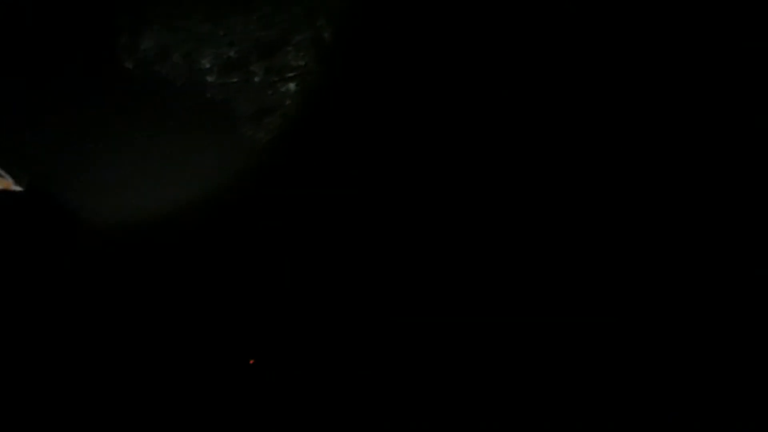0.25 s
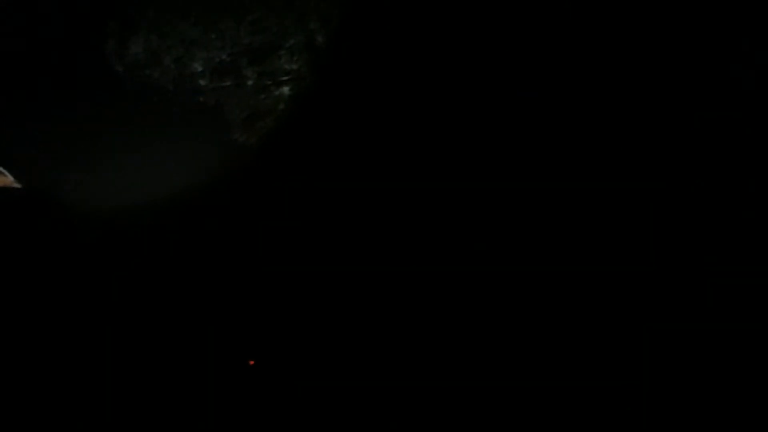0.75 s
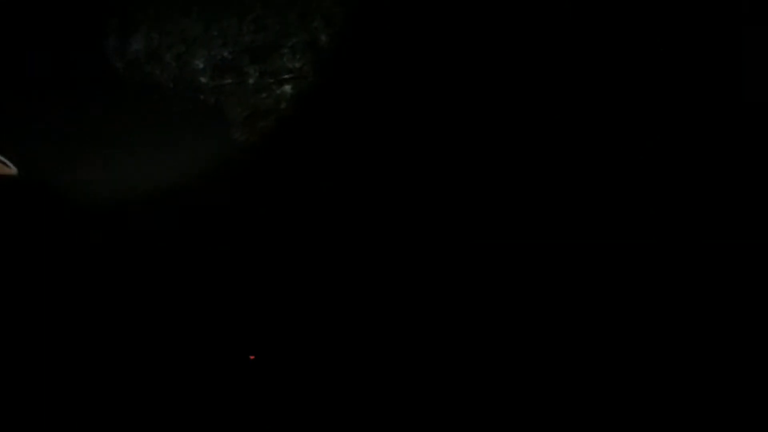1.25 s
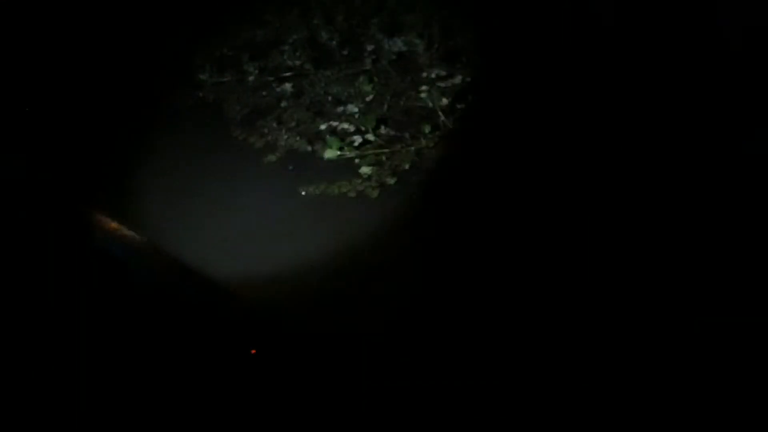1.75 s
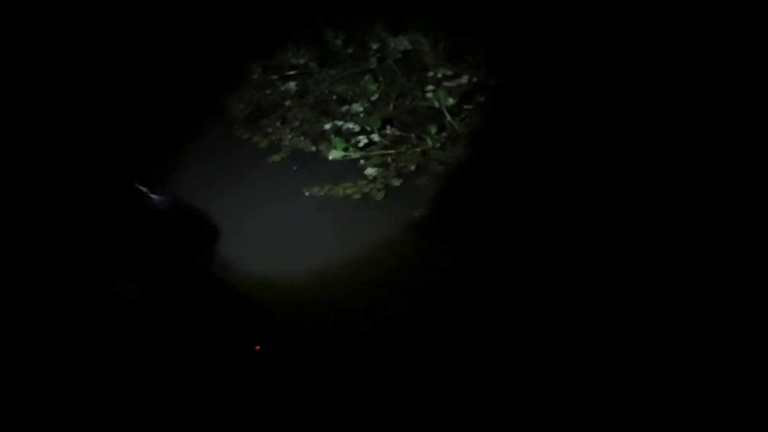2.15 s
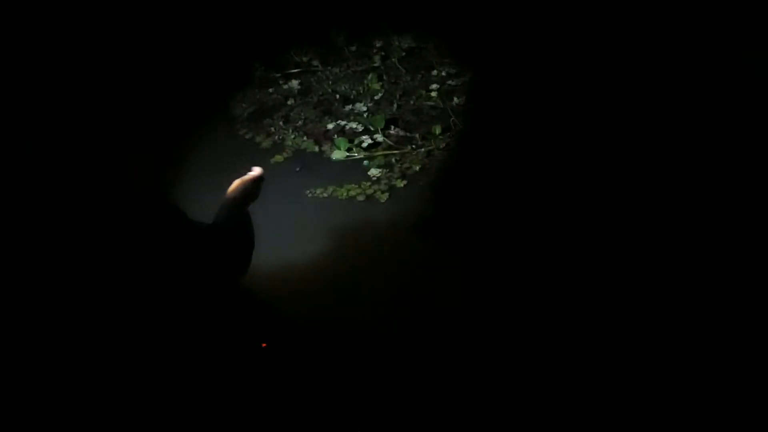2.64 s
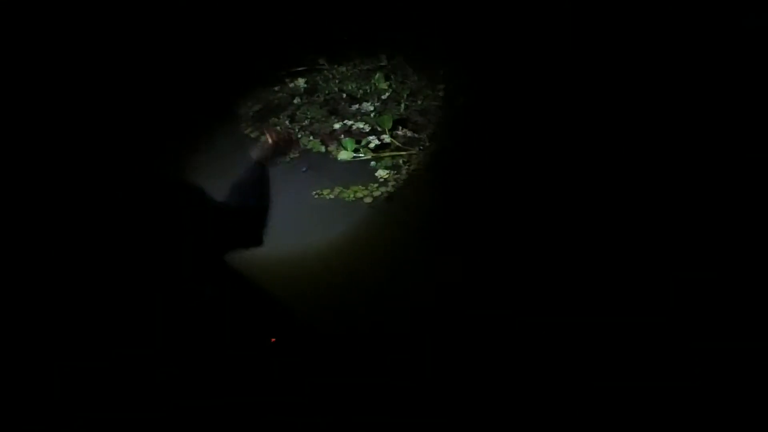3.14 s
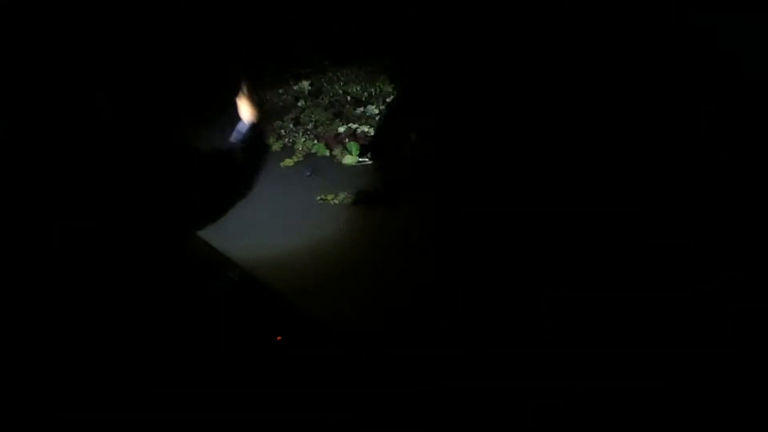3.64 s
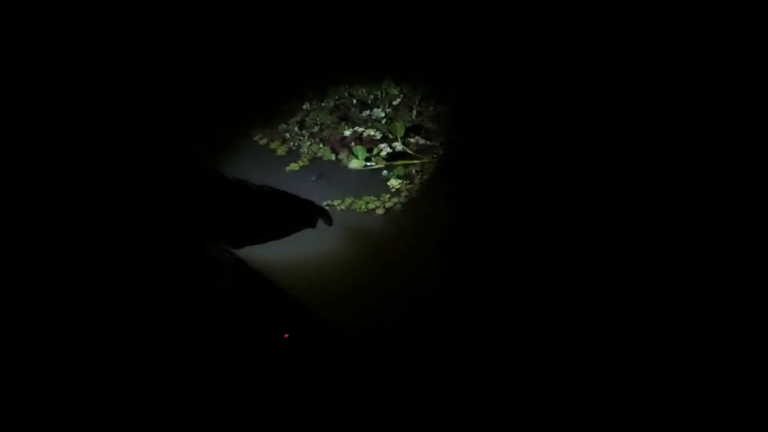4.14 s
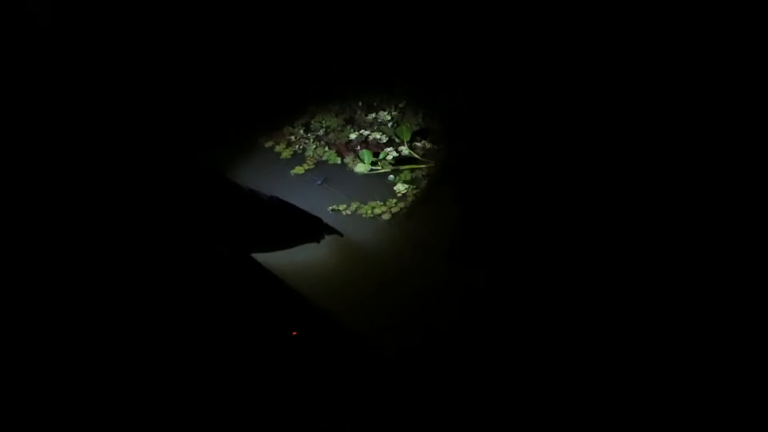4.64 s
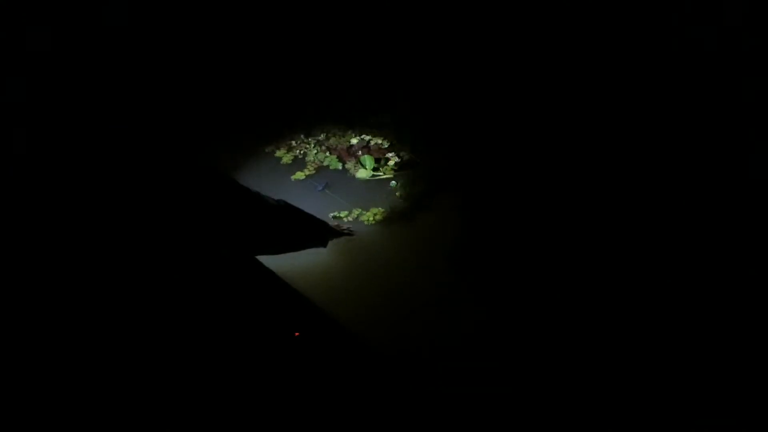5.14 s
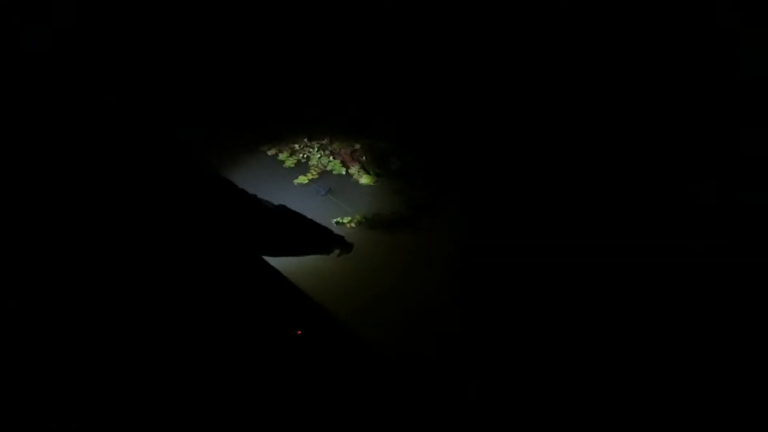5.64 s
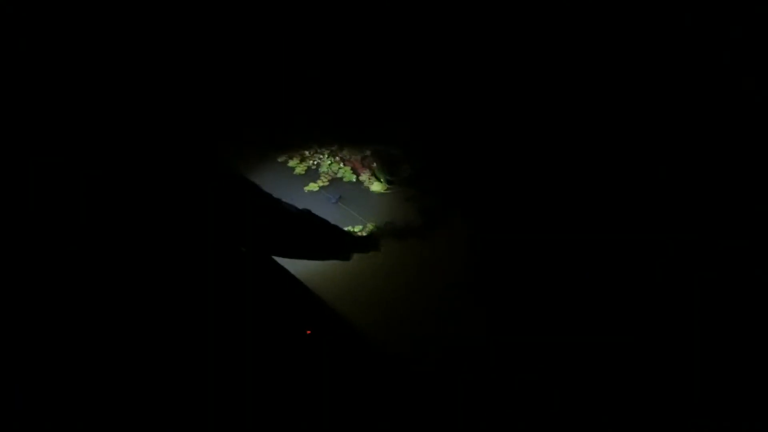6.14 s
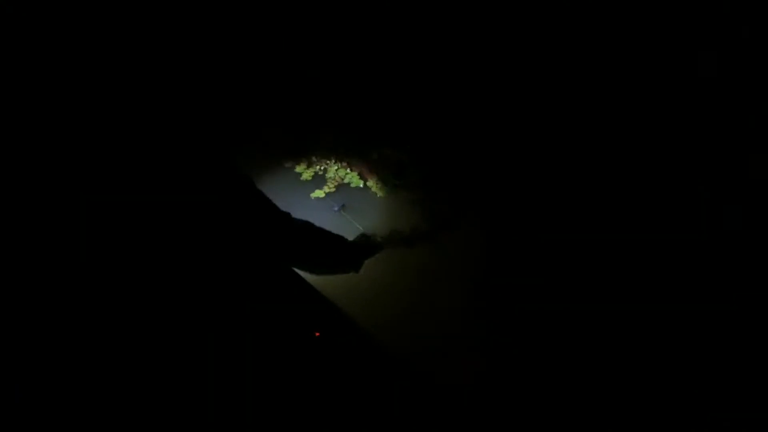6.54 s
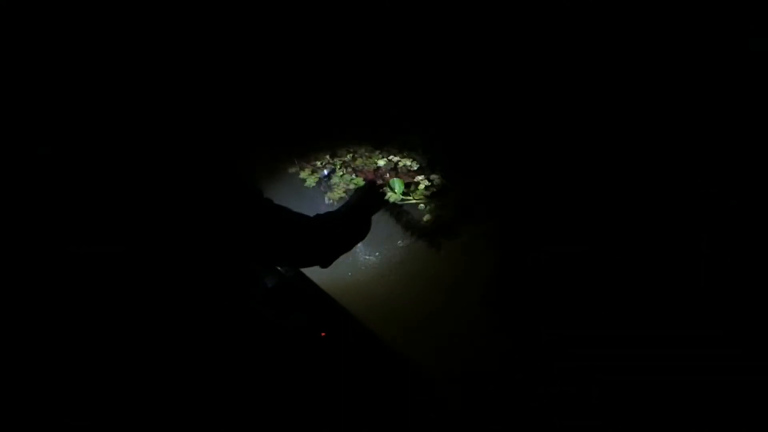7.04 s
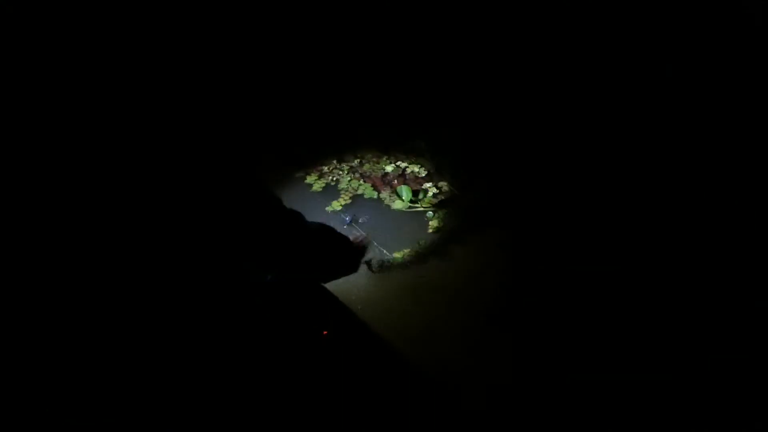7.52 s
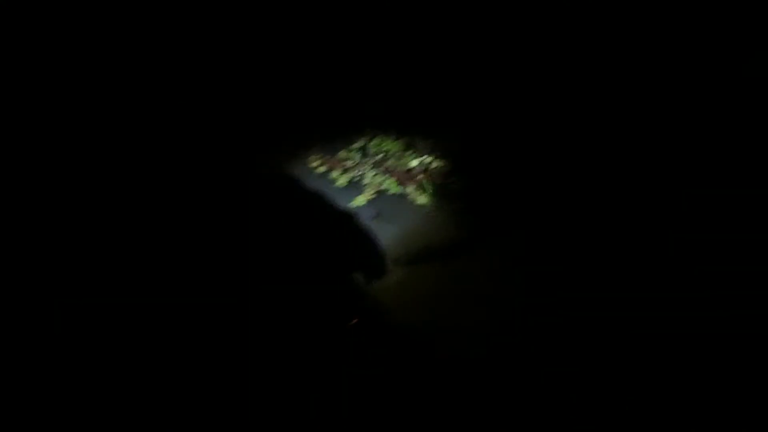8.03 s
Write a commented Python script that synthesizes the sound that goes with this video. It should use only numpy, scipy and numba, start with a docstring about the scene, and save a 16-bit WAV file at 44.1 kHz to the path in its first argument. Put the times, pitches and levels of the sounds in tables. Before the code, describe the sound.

Dark rainforest creek: shimmering crickets, crisp dry katydid rasps on the left, faint glugs under a boat, a water drop and a rising frog trill.

```python
"""Night on a rainforest creek, from a drifting boat

A murmur of water and leaves and the shrill of distant crickets are shaped noise. Planks knocked and a
bubble under a falling drop are decaying sines; water glugs at wavering pitches and gear scrapes as noise.
Frogs on the bank pip, chatter and trill as swept or pulsed tones. Close by on the left, katydids rasp
and shuffle: each tooth of the file rings the wings. A limiter ducks under the loudest rasps."""
import sys
import numpy as np
from scipy import signal
from scipy.fft import rfft, irfft
from scipy.io import wavfile
from scipy.ndimage import uniform_filter1d
from numba import njit

SR = 44100
rng = np.random.default_rng(int(sys.argv[2]) if len(sys.argv) > 2 else 0)


def dump(signal):
    """Clip the signal to [-1, 1] and save it as 16-bit WAV at the path in sys.argv[1]."""
    limited = np.clip(np.atleast_2d(signal).T, -1, 1)
    pcm = np.round(limited * 32767).astype(np.int16)
    wavfile.write(sys.argv[1], SR, pcm)


N = 365148
TIME = np.arange(N) / SR
FREQS = np.arange(N // 2 + 1) * SR / N

# Levels in all tables are relative: filters, panning and the limiter follow.
# resonance of the katydid's wings: [f/Hz, level/dB]
WING_RESONANCE = [(5500, -43), (7000, -39), (7400, -11.5), (8100, -20.5), (8700, -2), (9500, 2.5),
                  (10150, 5), (10750, -1.5), (11400, -1.5), (12100, -5.5), (12750, -4), (14000, -15.5),
                  (14800, -31.5), (15700, -39.5)]


def undb(db):
    """Convert decibels to amplitude gain."""
    return 10 ** (np.asarray(db) / 20)


def unit(x):
    """Normalise to an rms value of 1."""
    return x / np.sqrt(np.mean(x ** 2))


def pan(db):
    """Interaural level difference: gains for left minus right, in dB."""
    return undb(np.array([[db], [-db]]) / 2)


def over_hz(points, hz=FREQS):
    """Interpolate (f/Hz, value) points on a logarithmic frequency axis."""
    f, value = np.transpose(points)
    return np.interp(np.log(hz + 1), np.log(f), value)


def shape(x, gain):
    """Linear filtering: multiply the spectrum by a gain for each frequency."""
    return irfft(rfft(x) * gain, N)


def band(hz, width):
    """Squared magnitude response of a resonance, as if it were applied twice."""
    detuning = (FREQS ** 2 - hz ** 2) / ((FREQS + 1) * width * np.pi / 2)
    return 1 / (1 + detuning ** 2)


def spread(sound, apart):
    """Partial coherence: of three unrelated signals one is shared and one belongs to each side."""
    return unit(sound[0] + apart * sound[1:])


def walk(rate):
    """Band-limited random modulation: unit-rms wandering through `rate` random knots per second."""
    knots = rng.standard_normal(int(N / SR * rate) + 2)
    return unit(np.interp(TIME * rate, np.arange(len(knots)), knots))


def swell(t, length):
    """Gaussian envelope, about 4 dB down at half its length from the middle."""
    return np.exp(-2 * (t / length) ** 2)


def add(track, start, sound):
    """Superposition: mix a sound in from a start time in s."""
    i = int(start * SR)
    lo, hi = max(i, 0), min(i + len(sound), N)
    if hi > lo:
        track[lo:hi] += sound[lo - i:hi - i]


def forest(x, wet_db, t60):
    """Diffuse scattering from leaves and trunks: direct sound plus a decaying noise tail for each side."""
    t = TIME[:SR // 2]
    envelope = undb(-60 * t / t60) * (1 - np.exp(-t / .003))
    tail = rng.standard_normal((2, len(t))) * envelope
    tail /= np.sqrt(np.sum(tail ** 2, axis=1, keepdims=True))
    return x + undb(wet_db) * signal.fftconvolve(x[None], tail, axes=1)[:, :N]


def air(flicker_db=1.7):
    """Broadband turbulence: a low, softly fluttering murmur of water and leaves."""
    # murmur of the creek and forest: [f/Hz, level/dB]
    murmur_spectrum = [(20, -29), (45, -7), (65, -10), (110, -0.5), (180, 1), (300, 2), (450, -0.5),
                       (650, -4.5), (900, -5.5), (1300, -6.5), (1700, -12.5), (2300, -12), (3000, -16),
                       (8000, -12)]
    # strength of the murmur: [t/s, level/dB]
    murmur_course = [(0, -58.5), (2.2, -56), (4.6, -58), (6.2, -57.5), (6.7, -55.5), (8.28, -55.5)]
    gain = undb(over_hz(murmur_spectrum)) * (FREQS < 9000)
    murmur = spread(shape(rng.standard_normal((3, N)), gain), apart=0.48)
    level_db = np.interp(TIME, *np.transpose(murmur_course)) + flicker_db * walk(18)
    return undb(level_db) * murmur * pan(-1.72)


def crickets(shrill_hz=5200, drift_db=1.3, surge_peak_s=0.36, surge_period_s=1.27, surge_db=0.7):
    """Incoherent sum of many voices: each group is a noise band with random chirping."""
    # distant groups: [f/Hz, nominal width/Hz, level/dB, nominal chirp rate/Hz, chirp depth/dB,
    # left minus right/dB]
    cricket_groups = [(2520, 370, -73.5, 23, 5, 2), (3372, 32, -71, 12, 2, -6), (3410, 130, -77, 17, 4, -5),
                      (3538, 23, -72, 8.5, -0.5, 6), (3808, 225, -64.5, 41, 0, -6),
                      (4333, 464, -57.5, 37, 0.5, -0.5), (4905, 230, -67, 19, 2, -5),
                      (5470, 330, -57.5, 31, 1, 0), (5800, 356, -54.5, 53, 1.3, 3.5),
                      (6234, 490, -58.5, 19, 1.5, -2), (6770, 3500, -62.5, 19, 2, 9)]
    # the shrillest groups swell together in slow waves
    surge = undb(surge_db * np.cos(np.pi * (TIME - surge_peak_s) / surge_period_s) ** 2)
    out = 0
    for hz, width, db, rate, depth_db, pan_db in cricket_groups:
        noise = rng.standard_normal((3, N))
        voices = spread(shape(noise, band(hz, width) ** 1.44), apart=0.59)
        chirps = unit(undb(depth_db * walk(2 * rate) + drift_db * walk(1.816)))
        wave = surge if hz > shrill_hz else 1
        out = out + undb(db) * voices * chirps * pan(pan_db) * wave
    return out


def mode(hz, t60):
    """Damped normal mode: a sine decaying by 60 dB in t60 seconds."""
    t = TIME[:SR // 3]
    return np.sin(2 * np.pi * hz * t) * np.exp(-np.log(1000) * t / t60)


def glug(hz, length, attack_s=0.0012, sag=0.13, wobble=0.13, churn=0.55):
    """Cavity resonance: water shuts a pocket of air, a thud at a wavering pitch with some churning."""
    t = np.arange(0, 4 * length, 1 / SR)
    waver = np.interp(t / length, np.linspace(0, 4, 12), rng.standard_normal(12))
    pitch = hz * 2 ** (wobble * waver - sag * t / length)
    boom = np.sqrt(2) * np.sin(2 * np.pi * np.cumsum(pitch) / SR)
    hull = signal.butter(4, [hz * .65, hz * 1.7], "band", fs=SR, output="sos")
    # a long run lets the filter settle; only its end is used
    water = unit(signal.sosfilt(hull, rng.standard_normal(SR)))[-len(t):]
    envelope = (1 - np.exp(-t / attack_s)) * np.exp(-(t / length) ** 2 / 2)
    return envelope * (boom + churn * water)


def boat(knock_db=7.0, contact_s=.0008, bass_hz=(400, 900), scrape_db=-1.0):
    """Modal excitation: knocks ring the planks; water glugs under the hull and gear scrapes along it."""
    # knocks on the boat: [t/s, level/dB, bass level/dB]
    knock_events = [(.928, -62, 4.5), (.999, -62.5, 3), (1.118, -65, 2.5), (5.532, -58.5, -12),
                    (5.568, -63, -12), (5.596, -63.5, -8), (6.503, -60.5, -5), (8.004, -50.5, -2),
                    (8.067, -62, 0)]
    # modes of the boat's planks: [f/Hz, level/dB, t60/s]
    plank_modes = [(86, -5, 0.12), (137, -3.5, 0.076), (193, -1.5, 0.12), (345, 1, 0.045), (412, 5, 0.05),
                   (630, -1.5, 0.03), (753, -0.5, 0.038), (997, 1.5, 0.048), (1217, 2.5, 0.028),
                   (1334, -5, 0.044), (2230, -1, 0.016), (2670, -11, 0.031)]
    # glugs and dull bumps of water under the hull: [start t/s, f/Hz, level/dB, nominal length/s]
    water_bumps = [(0.664, 246, -59, 0.014), (0.94, 124, -53, .016), (1.142, 167, -56, 0.018),
                   (1.172, 190, -57, 0.023), (1.495, 178.4, -58, 0.043), (2.238, 210, -61.5, 0.03),
                   (2.972, 335, -50, 0.017), (3.015, 307, -60, 0.017), (3.24, 194, -54.5, 0.028),
                   (3.285, 169, -57, 0.029), (3.423, 290, -59.5, 0.02), (3.444, 177, -51, 0.019),
                   (5.266, 296, -52, 0.019), (5.308, 262, -53, 0.015), (5.343, 269, -50.5, 0.016),
                   (5.386, 290, -60, .012), (5.411, 263, -59.5, 0.028)]
    # gear scraping on the boat: [middle t/s, level/dB, nominal length/s]
    gear_scrapes = [(0.919, -63.5, 0.28), (8.09, -56, 0.12)]
    out = np.zeros(N)
    for s, db, bass_db in knock_events:
        # every blow lands on another spot, which detunes the modes
        spots = rng.standard_normal(len(plank_modes))
        for k, ((hz, gain_db, t60), spot) in enumerate(zip(plank_modes, spots)):
            tone = (-1) ** k * mode(hz * (1 + .02 * spot), t60)
            push = 1 - np.exp(-TIME[:len(tone)] / contact_s)
            low_db = bass_db * np.interp(hz, bass_hz, [1, 0])  # the low modes answer differently
            add(out, s, undb(db + knock_db + gain_db + low_db) * push * tone)
    for s, hz, db, length in water_bumps:
        add(out, s, undb(db) * glug(hz, length))
    rubbing = unit(shape(rng.standard_normal(N), band(hz=650, width=2300)))
    friction = rubbing * unit(undb(4.3 * walk(160)))
    out += friction * sum(undb(db + scrape_db) * swell(TIME - s, length) for s, db, length in gear_scrapes)
    return forest(out, wet_db=-13, t60=0.16) * pan(-9.5)


def drop():
    """Bubble oscillation: air trapped by a drop falling into the creek rings briefly."""
    # the drop: (t/s, bubble f/Hz, level/dB, t60/s)
    s, hz, db, t60 = (7.238, 930, -34.5, .07)
    out = np.zeros(N)
    bubble = mode(hz, t60)
    onset = 1 - np.exp(-TIME[:len(bubble)] / 0.0011)
    add(out, s, undb(db) * bubble * onset)
    return forest(out, wet_db=-13.0, t60=0.1) * pan(-9.5)


def pips(steepen_s=0.024, rough_db=3.0):
    """Frequency modulation: tiny hoarse whistles whose sweep steepens, rising at most an octave."""
    # pips of small frogs along the bank: [middle t/s, f/Hz there, level/dB, length/s,
    # sweep there/(octaves per s)]
    pip_notes = [(0.55, 1226, -55.5, 0.02, 25.5), (4.678, 1325, -54, 0.0053, 13),
                 (5.681, 1321, -56, 0.0069, 16), (5.82, 1243, -52, 0.0073, 16),
                 (5.974, 1855, -53, 0.0044, 18), (6.083, 1314, -58, 0.0073, 16),
                 (6.417, 1350, -56, 0.0083, 14), (6.574, 1857, -49.5, 0.0084, 20),
                 (6.754, 1314, -55, .007, 14), (7.21, 1820, -49, 0.0046, -22),
                 (7.222, 1340, -47, 0.0053, 17), (7.35, 1370, -57, 0.0054, 20),
                 (7.713, 1760, -54, 0.0064, -10), (7.75, 1336, -55, 0.0068, 10)]
    out = np.zeros(N)
    for s, hz, db, length, sweep in pip_notes:
        t = np.arange(-2 * length, 2 * length, 1 / SR)
        octaves = np.minimum(sweep * t * (1 + t / steepen_s), 1)
        whistle = np.sin(2 * np.pi * np.cumsum(hz * 2 ** octaves) / SR)
        add(out, s - 2 * length, np.sqrt(2) * undb(db) * swell(t, length) * whistle)
    hoarse = out * unit(undb(rough_db * walk(700)))
    return forest(hoarse, wet_db=-9, t60=0.05) * pan(-6.0)


def chatter(length=0.01, scoop=0.266, sag=0.081, third_db=-3, rough_db=4):
    """Harmonic synthesis: a frog's reedy notes leap up and sag, hoarse and rich in overtones."""
    # notes of the chatter: [middle t/s, nominal f/Hz, level/dB, overtone level/dB]
    chatter_notes = [(2.735, 1356, -45.5, -7), (2.78, 1267, -52, -3), (2.822, 1200, -58, 5),
                     (2.865, 1196, -53.5, 1), (2.913, 1080, -57.5, 4)]
    out = np.zeros(N)
    t = np.arange(-length, 2 * length, 1 / SR)
    bend = 2 ** (-sag * t / length - scoop * np.exp(-4 * (t / length + .5)))
    for s, hz, db, over_db in chatter_notes:
        angle = 2 * np.pi * np.cumsum(hz * bend) / SR
        first, second, third = (np.sin(k * angle) for k in range(1, 4))
        voice = first + undb(over_db) * (second + undb(third_db) * third)
        add(out, s - length, np.sqrt(2) * undb(db) * swell(t, length) * voice)
    hoarse = out * unit(undb(rough_db * walk(900)))
    return forest(hoarse, wet_db=-11.0, t60=0.083) * pan(-1.9)


def trill_course(rise_hz_per_s=1000, edge_s=0.0086):
    """Slow control of a pulsed voice: pitch, loudness, effort (1 at the end of each trill), remoteness and
    elapsed time."""
    # trills and their short closing notes: [start t/s, end t/s, nominal final f/Hz, final level/dB,
    # crescendo/dB, remoteness 0-1]
    trill_notes = [(0.2, 0.36, 2470, -72, 0, .95), (1.74, 1.88, 2510, -74, 1, 1),
                   (5.98, 6.06, 2523, -70.5, -1, 1), (6.065, 6.2, 2686, -68.5, -5, 0.98),
                   (6.22, 6.37, 2750, -74, -1, 1), (6.53, 6.72, 2594, -63.5, 7, 0.89),
                   (6.742, 6.775, 2544, -63.5, -4, 0.97), (6.8, 6.96, 2820, -73, -2, 0.9),
                   (7.09, 7.295, 2496, -53, 15.5, 0.28), (7.368, 7.634, 2560, -39.5, 24.5, 0.05),
                   (7.663, 7.692, 2590, -44.5, 0, 0.04), (7.72, 7.96, 2647, -64, 5, 1),
                   (8.13, 8.3, 2490, -58, 10, 0.95)]
    pitch = np.full(N, float(trill_notes[0][2]))
    loud, effort, remote, elapsed = np.zeros(N), np.ones(N), np.zeros(N), np.zeros(N)
    for start, end, hz, db, crescendo_db, remoteness in trill_notes:
        on = (TIME > start - edge_s / 2) & (TIME < end + edge_s / 2)
        t = TIME[on]
        edges = np.clip(np.minimum(t - start, end - t) / edge_s + .5, 0, 1)
        pitch[on] = hz - rise_hz_per_s * (end - t)
        effort[on] = undb(-crescendo_db * ((end - t) / (end - start)) ** 2)
        loud[on] = edges * undb(db) * effort[on]
        remote[on] = np.clip(remoteness, 0, 1)
        elapsed[on] = t - start
    return pitch, loud, effort, remote, elapsed


def trilling_frog(rise=0.12, weak_fall=0.12, fall=0.4, droop=0.065, detune=.008, far_detune=0.0195,
                  waver_db=1.5, stumble=0.068, pulses_per_s=98.7, trill_db=11.0, far_db=-3.0):
    """Pulsed excitation: each throat pulse swells fast, rings longer with effort and sags in pitch."""
    hz, loud, effort, remote, elapsed = trill_course()
    beats = elapsed * pulses_per_s
    phase = (beats + stumble * (1 - effort) * walk(50)) % 1
    # each pulse draws its own starting phase, size and detuning
    count = np.cumsum(np.diff(phase, prepend=0) < -.5)
    offset, size, sharp = rng.standard_normal((N // 100, 3))[count].T
    ringing = np.interp(effort * (1 - remote / 2), [0, 1], [weak_fall, fall])
    attack = 1 - np.exp(-(phase / rise) ** 2)
    pulse = attack * np.exp(-phase / ringing) * (1 - phase ** 8) * (fall / ringing)
    pitch = hz * (1 + droop * (.3 - phase) + (detune + far_detune * remote) * sharp)
    loud = loud * undb(waver_db * (1 - effort) * walk(40))  # unsteady until the frog is in full voice
    tone = np.sqrt(2) * np.sin(2 * np.pi * np.cumsum(pitch) / SR + 1.47 * offset)
    voice = loud * undb(trill_db + size / 2) * pulse * tone
    near, far = voice * (1 - remote), voice * remote * undb(far_db)
    blurred = forest(far, wet_db=1.5, t60=0.06)  # remote trills blur among the trees
    return (forest(near, wet_db=-9.5, t60=0.065) + blurred) * pan(-8.0)


def ring(spectrum, size=512):
    """Minimum-phase response by cepstral folding: causal, of a given spectrum, with unit energy."""
    hz = np.arange(size // 2 + 1) * SR / size
    cepstrum = irfft(np.log(undb(over_hz(spectrum, hz))))
    cepstrum[1:size // 2] *= 2
    cepstrum[size // 2 + 1:] = 0
    response = irfft(np.exp(rfft(cepstrum)))
    return response / np.sqrt(np.sum(response ** 2))


def wing(stroke_db, treble_db, vary_db=1.0, treble_hz=(8400, 12600),
         hard_from_db=-28.5, hard_low_db_per_db=0.67, hard_low_hz=(8260, 9000)):
    """Level-dependent resonance: hard strokes also stir the wings' lower ring, and no two are alike."""
    hz, db = np.transpose(WING_RESONANCE)
    lift = treble_db * np.interp(hz, treble_hz, [0, 1])
    hardness_db = max(stroke_db - hard_from_db, 0)
    body = hard_low_db_per_db * hardness_db * np.interp(hz, hard_low_hz, [1, 0])
    variation = vary_db * rng.standard_normal(len(hz))
    return ring(np.transpose([hz, db + lift + body + variation]))


def stroke(length, tooth_hz, jitter=0.16, uneven_db=2.0, scatter=0.75, scatter_s=0.00083):
    """Stridulation: a scraper clicks over each tooth of a file, building slowly and stopping quickly."""
    gap, size = rng.standard_normal((2, 160))
    times = np.cumsum(np.exp(jitter * gap)) / tooth_hz
    place = times / length - 2  # in stroke lengths from the strongest click
    force = np.where(place < 0, swell(place, 0.95), np.exp(-(np.abs(place) / 0.52) ** 4))
    clicks = np.zeros(int(4 * length * SR) + 1)
    inside = place < 2
    clicks[(times[inside] * SR).astype(int)] = (force * undb(uneven_db * size))[inside]
    # the wing flutters on briefly after each click, differently for every tooth
    keep = np.exp(-1 / (scatter_s * SR))
    envelope = np.sqrt(signal.lfilter([1 - keep], [1, -keep], clicks ** 2))
    flutter = envelope * rng.standard_normal(len(clicks))
    return (clicks + scatter * flutter) * np.sqrt(SR / tooth_hz / (1 + scatter ** 2))


def shuffle(loose_s=0.0033, loose_db=3.5, steady_db=1.3, stroke_share=.44, trail_stroke_s=0.021,
            trail_drop_db=4, trail_max_db=-50, trail_fade_db_per_s=9, trail_strokes_per_s=29):
    """Quasi-periodic strokes (t/s, level/dB, length/s): even runs, each trailing off loosely to the next."""
    # runs of even wing strokes: [first stroke t/s, last stroke t/s, rate/(strokes per s),
    # first level/dB, last level/dB]
    stroke_runs = [(0.087, 0.253, 30, -46.5, -47), (0.792, 0.99, 32, -42, -44),
                   (1.178, 1.27, 19, -45, -40.5), (1.544, 1.87, 28.7, -44, -52.5),
                   (2.558, 2.773, 34, -45.5, -48.5), (3.564, 3.935, 31.5, -45.5, -49.5),
                   (4.561, 4.83, 32, -44.5, -43), (4.87, 5.22, 26.5, -42, -42),
                   (5.449, 5.674, 30.3, -50, -50), (6.063, 6.205, 11.4, -40.5, -41.5),
                   (6.409, 6.534, 25.5, -43.5, -41), (6.768, 6.826, 33.5, -47.5, -44.5),
                   (7.741, 7.982, 35, -45, -48.5)]
    strokes = []
    next_starts = [run[0] for run in stroke_runs[1:]] + [N / SR]
    for (first, last, rate, first_db, last_db), resume in zip(stroke_runs, next_starts):
        run_chance, trail_chance = rng.standard_normal((2, 64, 2))
        times = np.linspace(first, last, round((last - first) * rate) + 1)
        for s, (effort, _) in zip(times, run_chance):
            db = np.interp(s, [first, last], [first_db, last_db]) + steady_db * effort
            strokes.append((s, db, stroke_share / rate))  # a stroke fills a share of its cycle
        trail_count = round((resume - last) * trail_strokes_per_s)
        times = np.linspace(last, resume, trail_count + 1)[1:-1]
        trail_db = min(last_db - trail_drop_db, trail_max_db)
        for s, (effort, late) in zip(times, trail_chance):
            db = trail_db - trail_fade_db_per_s * (s - last) + loose_db * effort
            strokes.append((s + loose_s * late, db, trail_stroke_s))
    return strokes


def katydid(tooth_hz=900, soft_tooth_hz=1100, far_db=-62, far_rough_db=1.5, far_shuffle_db=1.7):
    """Source and resonator: tooth clicks of rasps and softer strokes are convolved with the wings' ring."""
    # single rasps, the loudest about once a second: [middle t/s, level/dB, nominal length/s,
    # treble level/dB]
    rasp_events = [(0.058, -41, 0.019, 2), (0.518, -35.5, 0.017, 8), (0.734, -40, 0.023, 0),
                   (1.027, -44.5, 0.028, -8), (1.403, -23.5, 0.02, 7.5), (1.482, -35.5, 0.019, 3),
                   (1.735, -41, 0.023, 9), (1.979, -40.5, 0.011, -15), (2.231, -40.5, 0.035, -1),
                   (2.447, -23, 0.023, 10), (2.507, -36.5, 0.027, 9), (2.807, -43, 0.029, 2),
                   (2.938, -38.5, 0.022, -3), (3.008, -43, 0.022, 3), (3.325, -42.5, 0.025, 2),
                   (3.496, -25, 0.021, 7), (3.621, -37.5, 0.027, 9), (3.877, -45, 0.023, -1),
                   (4.412, -37.5, 0.023, -2), (4.513, -42, 0.051, 3), (4.615, -36.5, 0.031, 6),
                   (5.363, -25.5, 0.024, 6.5), (5.735, -35.5, 0.022, 10), (6.325, -33, 0.021, -8),
                   (6.681, -24.5, 0.022, 5), (6.885, -36.5, 0.025, 10), (7.507, -41.5, 0.036, 0),
                   (7.635, -26, 0.026, 5.5), (7.861, -43, 0.025, -2), (8.027, -33.5, 0.014, -7),
                   (8.08, -35.5, 0.024, 8)]
    song = np.zeros(N)
    for s, db, length, treble_db in rasp_events:
        clicks = stroke(length, tooth_hz, jitter=.09, uneven_db=.5, scatter=.6)
        add(song, s - 2 * length, undb(db) * signal.fftconvolve(clicks, wing(db, treble_db)))
    for s, db, length in shuffle():
        clicks = stroke(length, soft_tooth_hz)
        add(song, s - 2 * length, undb(db) * signal.fftconvolve(clicks, wing(db, 0)))
    near = forest(song, wet_db=-4.5, t60=0.04) * pan(7.6) * undb(-4.0)
    # more of its kind, far off, merge into a grainy, restless hiss that fills the gaps
    noise = rng.standard_normal((3, N))
    far = spread(shape(noise, undb(over_hz(WING_RESONANCE))), apart=0.15)
    grain = unit(undb(far_rough_db * walk(1500) + far_shuffle_db * walk(60)))
    return near + undb(far_db) * far * grain * pan(9.7)


def scene():
    """Superposition of all the night's sounds."""
    background = air() + crickets() + boat() + drop()
    frogs = pips() + chatter() + trilling_frog()
    return background + frogs + katydid()


@njit
def follow(x, release):
    """Peak detection: rises at once and falls back exponentially."""
    out, e = np.empty(len(x)), 0.
    for i in range(len(x)):
        e = max(x[i], e * release)
        out[i] = e
    return out


def record(dry, limit_db=-15.5, release_s=0.33, top_hz=15500):
    """Interchannel phase, then limiting: the bass turns out of phase, peaks are held, the top is cut."""
    # phase by which the left microphone leads the right: [f/Hz, phase/rad]
    port_phase = [(260, 3.075), (1300, 2.556), (2500, 2.25), (3360, 1.84), (4400, 1.32), (5800, 0.86),
                  (7000, 0.43), (12000, 0.54), (15000, 0.34)]
    turn = np.exp(1j * over_hz(port_phase) * np.array([[1], [-1]]) / 2)
    wide = shape(dry, turn)
    peak = follow(np.abs(wide).max(axis=0), np.exp(-1 / (release_s * SR)))
    gain = uniform_filter1d(1 / np.maximum(1, peak / undb(limit_db)), size=64)
    low_pass = signal.ellip(8, .2, 70, top_hz, fs=SR, output="sos")
    return signal.sosfilt(low_pass, wide * gain)


dry = scene()
out = record(dry)
dump(out)
```